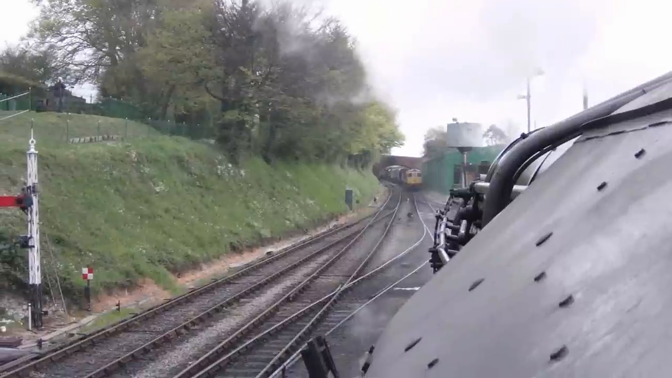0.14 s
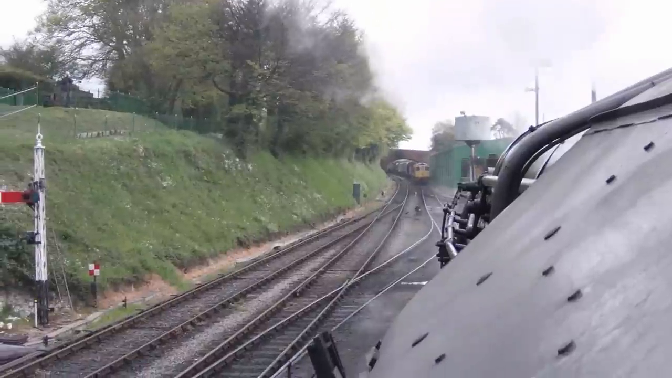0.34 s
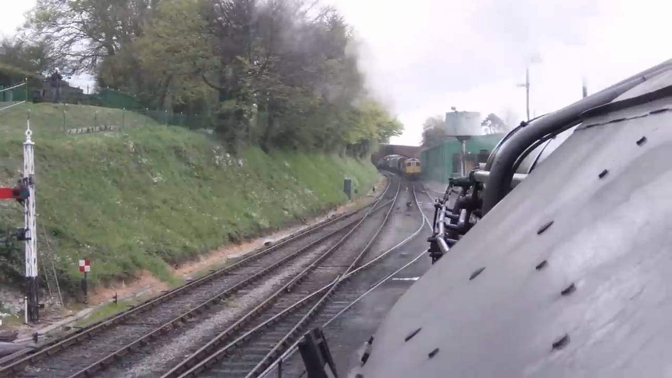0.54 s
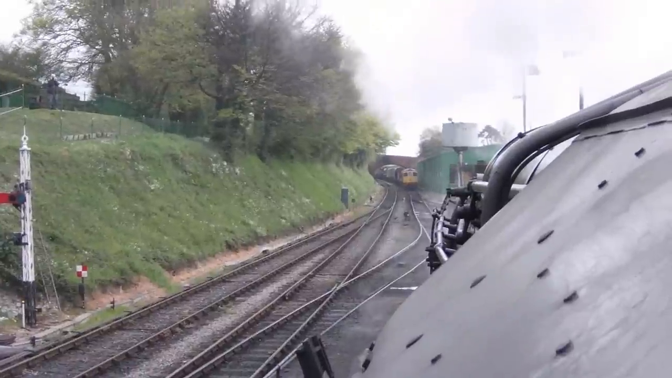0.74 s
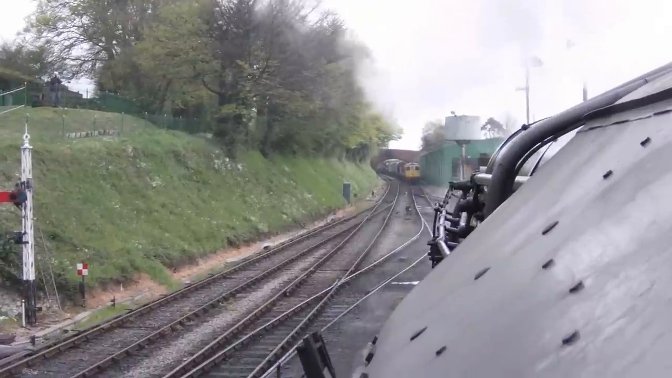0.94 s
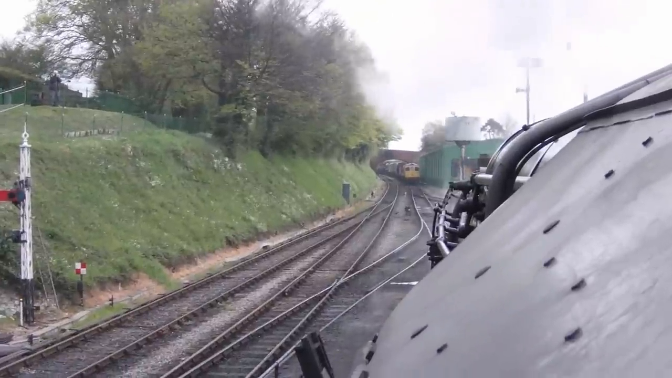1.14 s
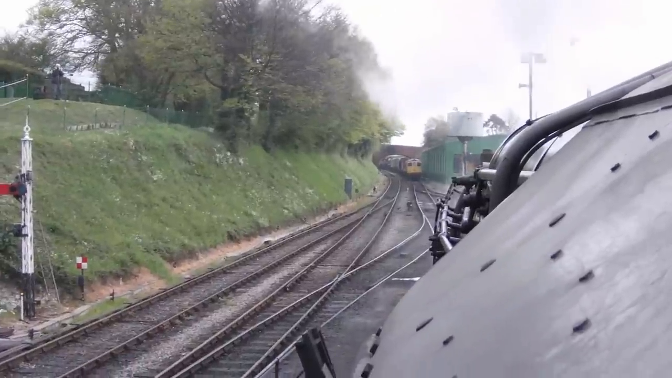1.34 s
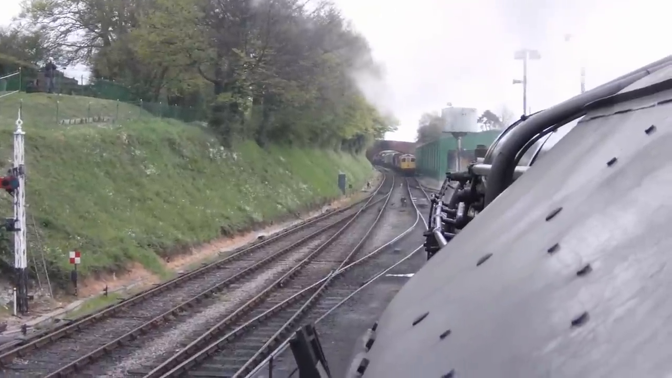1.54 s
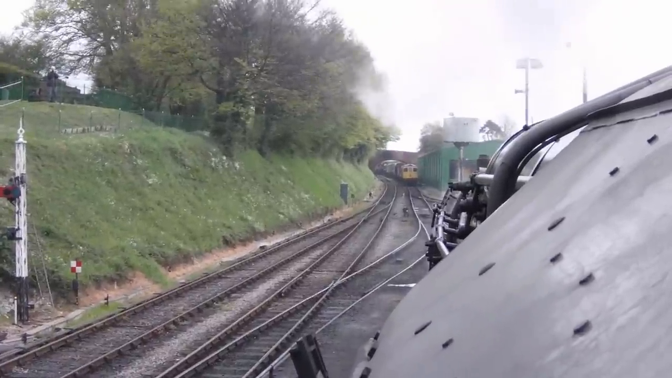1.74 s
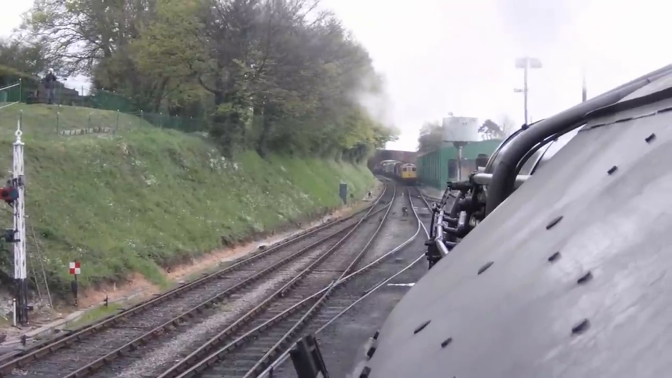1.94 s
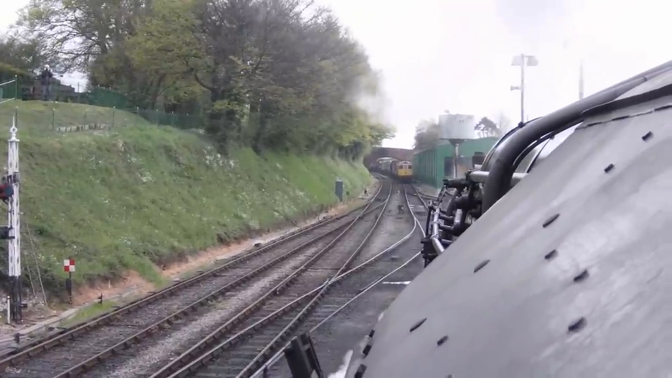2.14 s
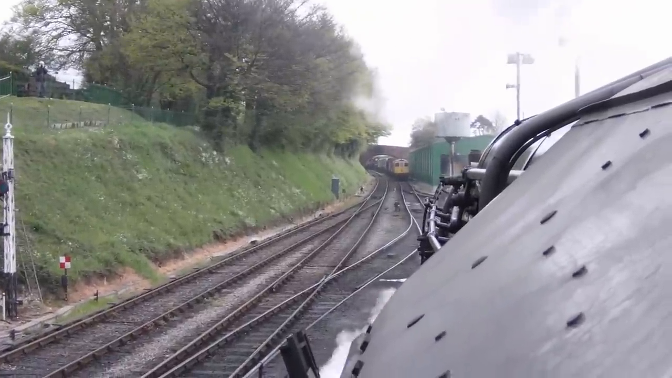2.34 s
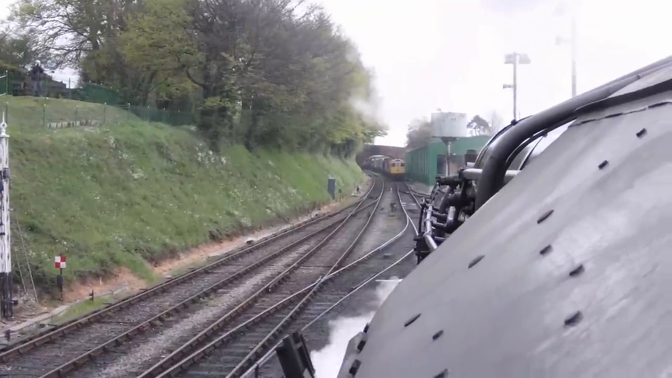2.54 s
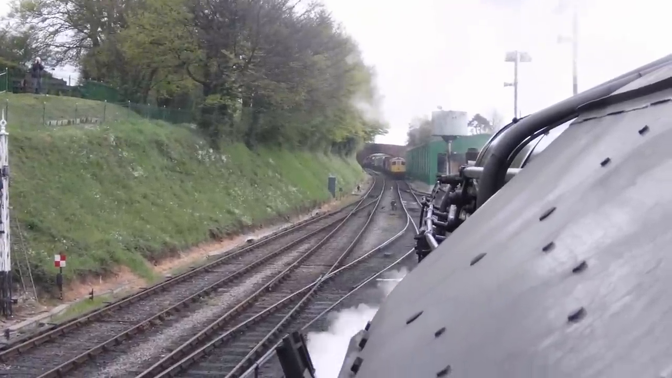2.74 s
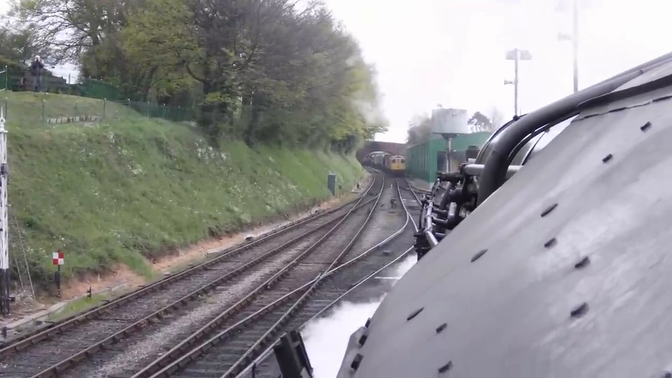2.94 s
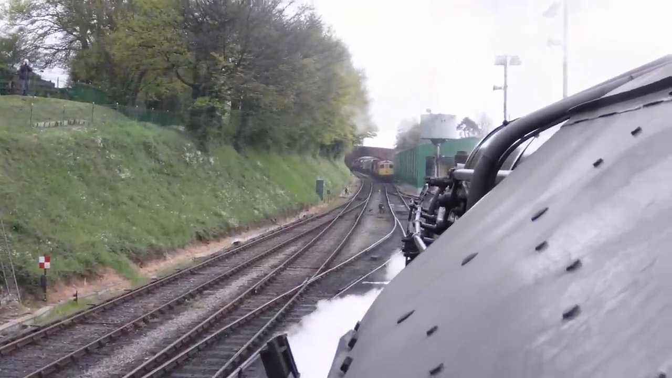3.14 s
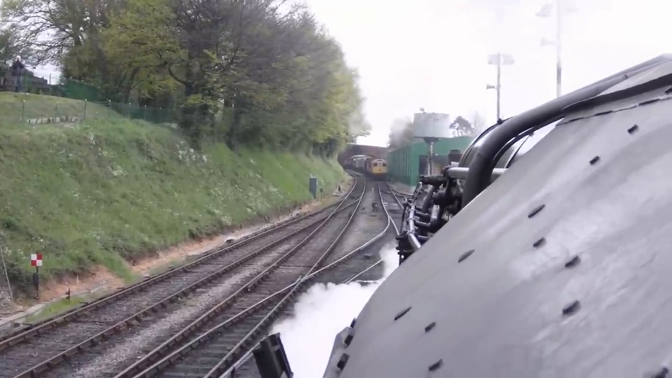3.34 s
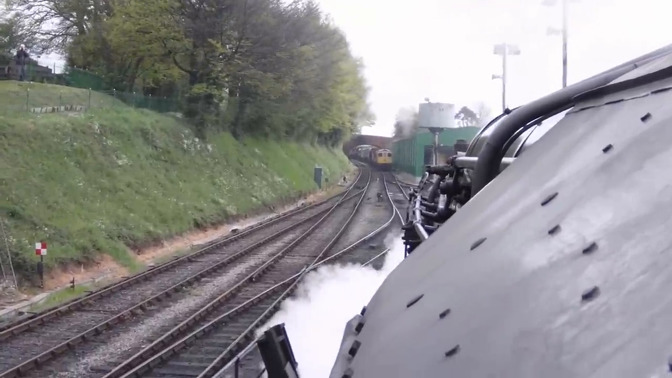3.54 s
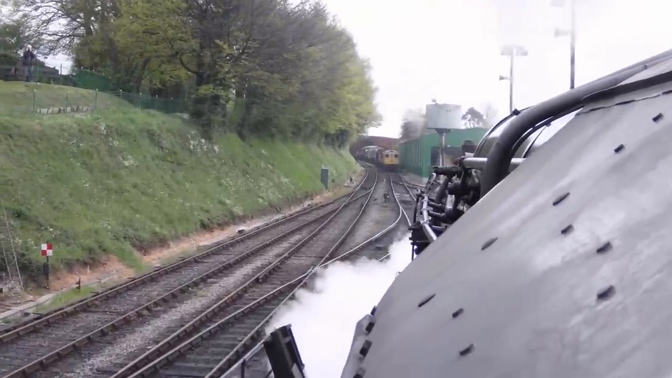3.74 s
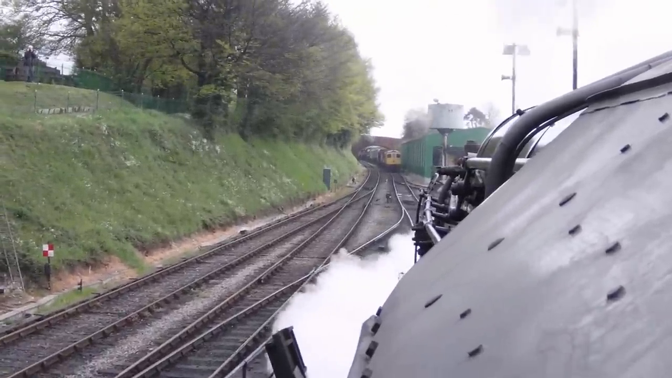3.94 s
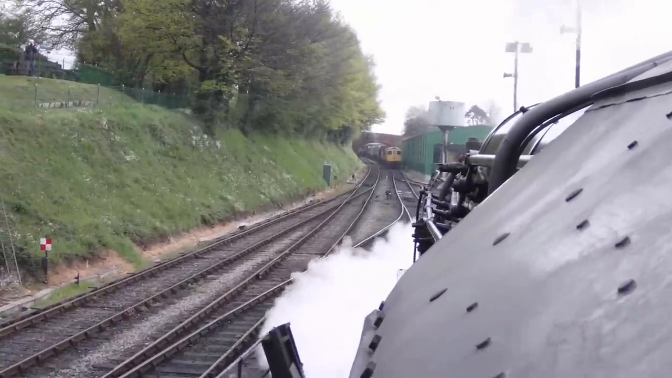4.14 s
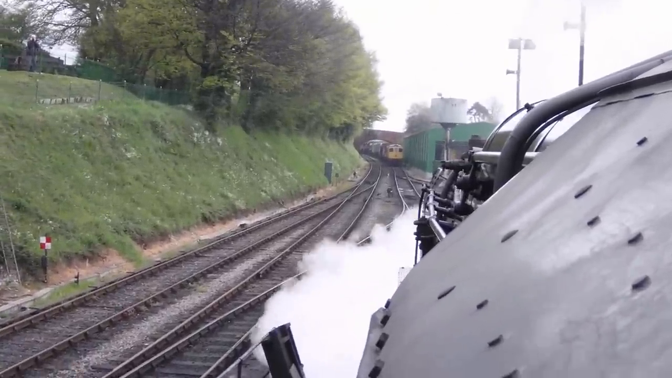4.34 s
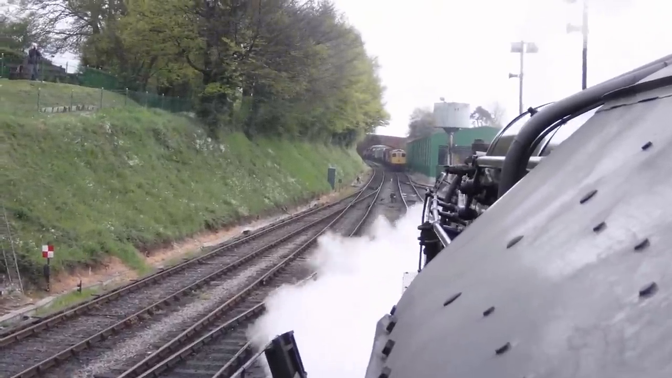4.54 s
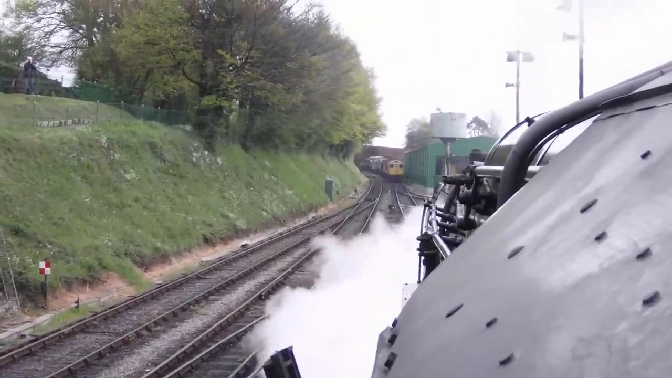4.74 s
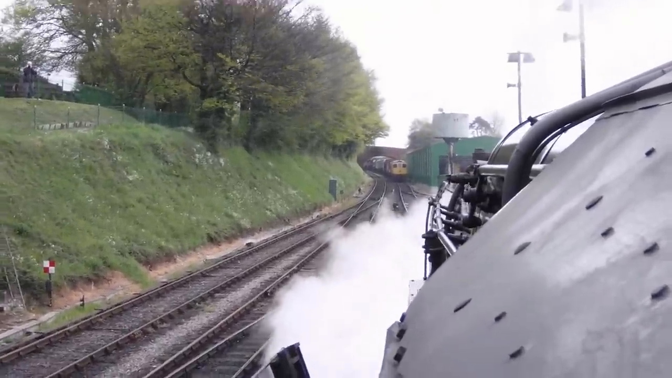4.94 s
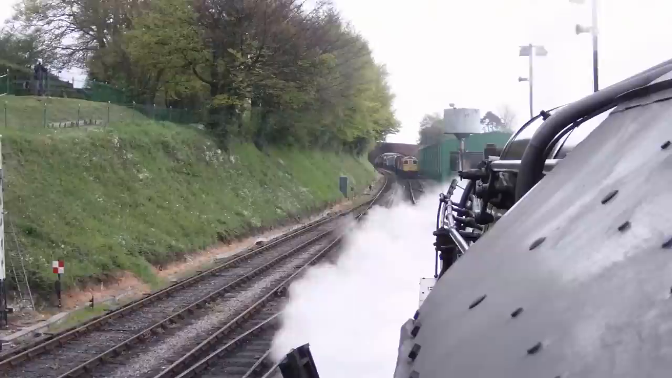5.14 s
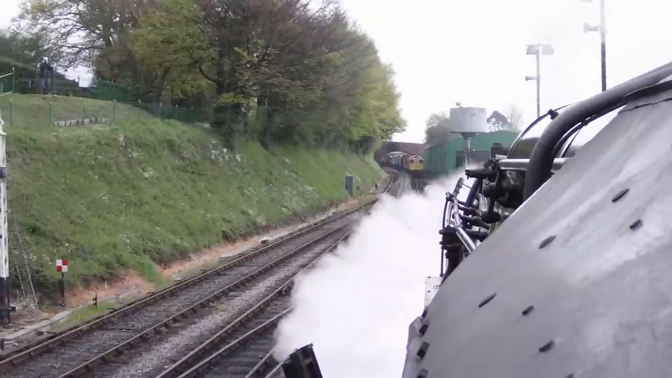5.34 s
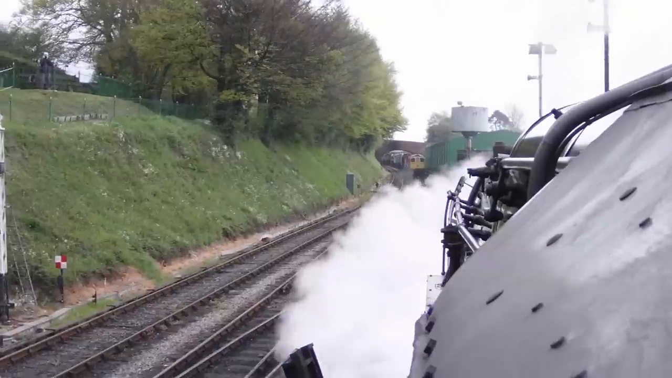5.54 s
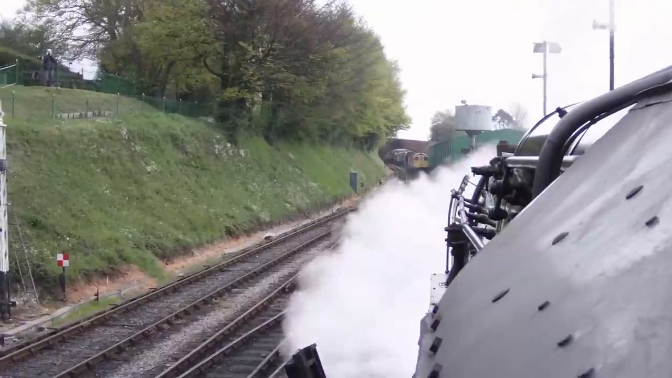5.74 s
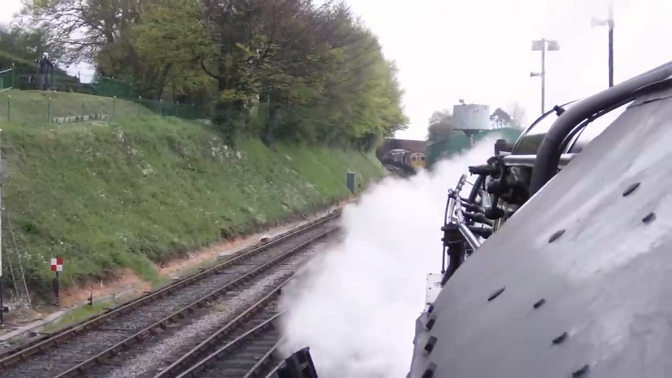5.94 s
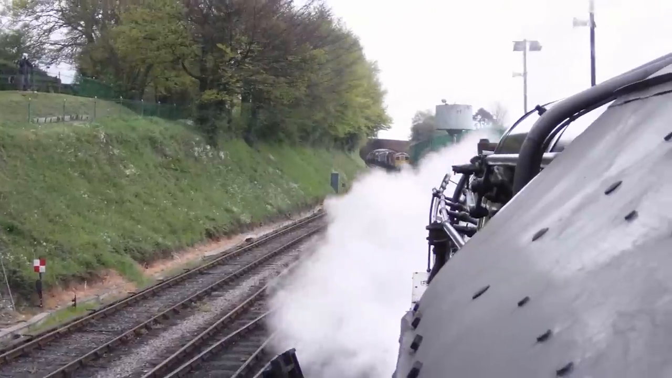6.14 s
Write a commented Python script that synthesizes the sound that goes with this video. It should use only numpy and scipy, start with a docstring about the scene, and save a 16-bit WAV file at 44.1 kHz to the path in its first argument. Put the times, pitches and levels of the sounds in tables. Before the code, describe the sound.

Outdoors, close beside a steam locomotive's boiler, soft steady steam leaks over a low, hollow chimney roar. A drain cock opens and its wet hiss swells into a long, harsh blast that overloads the microphone. It shuts abruptly, slack steel gear rattles and clanks, a shorter spurt follows with a second clank, then leaking steam and a growing wheel rumble remain.

```python
"""Steam leaks steadily and draught roars in the chimney as a steam locomotive eases away from a stand.
A drain cock then blows a long, fierce hiss that overloads the microphone, and spits once more.
As the jet dies, slack steel gear takes up with two rattling clanks; the rumble of the wheels grows.
Steam, air and wheels are coloured noise, the clanks noise bursts over decaying modes, the thud a sine pulse."""
import sys
import numpy as np
from scipy import signal
from scipy.fft import rfft, irfft
from scipy.io import wavfile

SR = 44100
rng = np.random.default_rng(int(sys.argv[2]) if len(sys.argv) > 2 else 0)


def to_wav(sig):
    """Store sig (one row per channel, or 1-D mono) as 16-bit WAV at the path in sys.argv[1].

    Samples outside -1..1 are clipped; the rate is SR.
    """
    pcm = np.clip(np.atleast_2d(sig), -1, 1) * 32767
    pcm = np.round(pcm).astype(np.int16)
    wavfile.write(sys.argv[1], SR, pcm.T)  # frames by channels


N = 277389
TIME = np.arange(N) / SR
BINS = np.maximum(np.fft.rfftfreq(N, 1 / SR), 1)


def from_db(db):
    """Decibels to amplitude gain."""
    return 10 ** (np.asarray(db) / 20)


def rms_one(x):
    """Scale to unit rms."""
    return x / np.sqrt(np.mean(x ** 2) + 1e-20)


def at_hz(points):
    """Interpolate a (Hz, value) curve over log frequency."""
    hz, value = np.transpose(points)
    return np.interp(np.log(BINS), np.log(hz), value)


def ease(at_s, rise_s):
    """A smooth step from 0 to 1 about its mid-point."""
    return .5 + .5 * np.tanh((TIME - at_s) / rise_s)


def drift(rate_hz):
    """Slow low-passed chance with a spread of 1."""
    step = 100  # samples between drawn points
    size = N // step + 2
    rolloff = 1 + (np.fft.rfftfreq(size, step / SR) / rate_hz) ** 2
    slow = irfft(rfft(rng.standard_normal(size)) / rolloff, size)
    return np.interp(np.arange(N) / step, np.arange(size), rms_one(slow))


def resonances(modes):
    """Power spectrum of a set of (Hz, width Hz, dB) peaks."""
    return sum(from_db(db) ** 2 / (1 + ((BINS - hz) / width) ** 2 * 2) ** 2 for hz, width, db in modes)


def turbulence(gain, likeness, phase=0):
    """Coloured noise at two microphone ports, correlated by likeness; rms 1."""
    mid, side = rfft(rng.standard_normal((2, N)))
    alike = np.clip(likeness, 0, 1)
    mid = mid * np.sqrt(1 + alike)
    side = side * np.sqrt(1 - alike)
    left = mid + side
    right = (mid - side) * np.exp(-1j * phase)
    return rms_one(irfft(gain * np.array([left, right]), N))


def passing_echoes(x, echo_db, nearest_s=.0017, farthest_s=.0036, rate_hz=2.7, count=8):
    """Short echoes off rails, ballast and boiler come and go, rippling the spectrum."""
    out = x.copy()
    for delay_s in rng.uniform(nearest_s, farthest_s, count):
        out += from_db(echo_db) * drift(rate_hz) * np.roll(x, round(delay_s * SR), axis=1)
    return rms_one(out)


def jet_flow(build_s=.69, release_s=.175):
    """Steam flow as a gain: it builds while the cock is open and dies quickly once it shuts."""
    # openings of the drain cock: opens_s, shuts_s, full_flow_level_db
    blows = [(1.31, 4.56, -4.2), (4.76, 5.24, -6.3)]
    flow = 1e-4
    for opens_s, shuts_s, level_db in blows:
        open_age = np.clip(TIME - opens_s, 0, shuts_s - opens_s)
        build = (1 - np.exp(-open_age / build_s)) ** 2
        release = np.exp(-np.maximum(TIME - shuts_s, 0) / release_s)
        flow = flow + from_db(level_db) * build * release
    return flow


def breeze(flow, steady_db=-45, stirred_db=-32.5, gust_db=1.0, gust_hz=7):
    """Moving air rumbles on each microphone port separately, more so while the jet blows."""
    # air rumble spectrum: frequency_hz, density_db_per_hz
    air_colour = [(10, -2), (35, 5.5), (80, 0.5), (160, -11), (400, -27), (1500, -50)]
    strength = from_db(steady_db) + from_db(stirred_db) * flow
    return turbulence(from_db(at_hz(air_colour)), 0) * strength * from_db(gust_db * drift(gust_hz))


def leak(load, level_db=-20.8, load_db=1.8, flutter_db=0.5, flutter_hz=4.5, pan_db=0.6):
    """Softer steam from glands and valves, arriving at a slant around the boiler."""
    # hiss spectrum: frequency_hz, density_db_per_hz
    leak_colour = [(150, -7), (600, -7.5), (1150, -0.5), (2200, .4), (3400, -0.8), (4800, -.9),
                   (6000, -1.5), (7300, 0), (8300, -2), (9300, -6), (10500, -10.5), (12000, -18.5),
                   (15000, -25)]
    # left-right correlation: frequency_hz, likeness_0_to_1
    leak_likeness = [(300, 0.98), (1200, 0.98), (2000, 0.83), (2900, 0.33), (3700, 0.54), (4600, .13),
                     (6300, 0.41), (8000, 0.33), (10000, .13), (15000, .12)]
    # phase between ports: frequency_hz, left_lead_rad
    leak_phase = [(100, 0), (1500, -0.12), (3000, -.5), (4500, -1.4), (6000, -2), (8300, -2.5), (10000, -3)]
    hiss = turbulence(from_db(at_hz(leak_colour)), at_hz(leak_likeness), at_hz(leak_phase))
    level = from_db(level_db + load_db * load + flutter_db * drift(flutter_hz))
    return hiss * level * from_db([[pan_db], [-pan_db]])


def wheels(load, start_db=-48, growth_db_per_s=2.5, load_db=4.8, lump_db=0.7, lump_hz=5):
    """Heavy wheels roll unevenly over the rails, louder with speed and load."""
    # rolling spectrum: frequency_hz, density_db_per_hz
    rumble_colour = [(15, -7), (30, 2), (44, 3), (58, -3), (85, 1), (120, -5), (230, -5), (340, -10),
                     (560, -10.5), (2000, -31), (6000, -53)]
    level_db = start_db + growth_db_per_s * TIME + load_db * load
    return turbulence(from_db(at_hz(rumble_colour)), 1.0) * from_db(level_db + lump_db * drift(lump_hz))


def firebox_drone(load, level_db=-32.7, load_db=-4):
    """The draught excites one low firebox resonance, weaker under load."""
    # firebox resonance: frequency_hz, width_hz, level_db
    firebox = [(191.6, 21.6, 0)]
    return turbulence(np.sqrt(resonances(firebox)), 1.0) * from_db(level_db + load_db * load)


def chimney_roar(load, level_db=-29.6, load_db=1.8, surge_db=.8, surge_hz=5.9):
    """The blower's draught excites the resonances of smokebox and chimney."""
    # smokebox and chimney resonances: frequency_hz, width_hz, level_db
    chimney = [(149, 29, -6), (243, 37, -5.5), (322, 47, -1.5), (391, 46, -3), (460, 71, -12.5),
               (646, 140, -15.5), (890, 62, -4.5), (1382, 66, -7)]
    level = from_db(level_db + load_db * load + surge_db * drift(surge_hz))
    return turbulence(np.sqrt(resonances(chimney)), 1.0) * level


def chimney_hoots(murmur_db=-38.5, swell_s=0.069):
    """The draught makes a narrow chimney resonance murmur, with brief swells in power."""
    # chimney note: frequency_hz, width_hz, level_db
    note_modes = [(803.4, 32, 0)]
    # swells of the note: peak_s, swell_level_db
    hoots = [(.36, -31), (1.27, -34), (1.62, -30.5), (5.48, -31), (5.92, -35)]
    swells = sum(from_db(db) ** 2 * np.exp(-((TIME - s) / swell_s) ** 2) for s, db in hoots)
    note = turbulence(np.sqrt(resonances(note_modes)), 0.98)
    return note * np.sqrt(from_db(murmur_db) ** 2 + swells)


def frame_thud(start_s=2.194, hz=72, swell_s=0.016, level_db=-19):
    """One soft, deep bump as the frames take the strain: a sine in a swelling, dying envelope."""
    age = np.maximum(TIME - start_s, 0)
    envelope = (age / swell_s) ** 2 * np.exp(2 - 2 * age / swell_s)
    return from_db(level_db) * envelope * np.sin(2 * np.pi * hz * age)


def knocks(count=4, chatter_s=.02, growth_db=.5, thump_hz=165, thump_db=-6, thump_delay_s=.008):
    """Each slam chatters in harder, deeper knocks and thumps the frames: (s, level dB, centre Hz)."""
    # slack gear slamming home: start_s, level_db, contact_centre_hz, pitch_spread_octaves (either way)
    slams = [(4.678, -15.5, 680, 1.4), (4.692, -14, 640, 1.55), (4.718, -15, 620, 1.6),
             (4.735, -16.5, 1300, .55), (4.996, -14.5, 1220, .6), (5.007, -15, 2350, .3),
             (5.050, -21.5, 850, 1.1)]
    rows = []
    for start_s, level_db, centre_hz, spread in slams:
        progress = (np.arange(count) + rng.random(count) / 2) / count
        times_s = start_s + chatter_s * progress
        levels_db = level_db + growth_db * (progress - .5)
        pitches_hz = centre_hz * 2 ** (spread * np.linspace(1, -1, count))
        rows += zip(times_s, levels_db, pitches_hz)
        rows.append((start_s + thump_delay_s, level_db + thump_db, thump_hz))
    return rows


def clanks(spread_octaves=0.64, crash_t60_s=0.16, crash_db=0, ring_db=-4.5, rise_s=0.00056, side_db=-11):
    """Each knock wakes the steel's modes near its own pitch, over a short crash of crowded plate modes."""
    # steel modes: frequency_hz, level_db, t60_s
    steel = [(237, 0.5, 0.27), (396, -3.5, 0.2), (479, -2.5, 0.17), (626, -9, 0.28), (852, 2.5, 0.2),
             (1044, 2, 0.26), (1240, -10, .25), (1447, -6, 0.28), (1520, -7, .25), (1769, -4, 0.31),
             (2047, 1, 0.24), (2460, -5, .3), (2550, -12, .25), (2695, -1.5, 0.29), (3424, -1, 0.18),
             (3849, -13, .25)]
    hz, mode_db, t60_s = np.transpose(steel)[:, :, None]
    out, size = np.zeros((2, N + SR)), SR // 3
    age = np.arange(size) / SR
    bins = np.maximum(np.fft.rfftfreq(size, 1 / SR), 1)

    def contact(f_hz, centre_hz):
        """Contact spectrum: a bell over log frequency."""
        return 1 / (1 + (np.log2(f_hz / centre_hz) / spread_octaves) ** 2 / 2) ** 2

    for start_s, level_db, centre_hz in knocks():
        noise = rfft(rng.standard_normal((2, size)))
        mid, side = irfft(noise * contact(bins, centre_hz), size)
        crash = rms_one(mid + from_db(side_db) * side * [[1], [-1]])
        crash = crash * from_db(crash_db - 60 * age / crash_t60_s)
        jitter_db = rng.normal(0, 1, hz.shape)
        strength = contact(hz, centre_hz) * from_db(mode_db + ring_db + jitter_db)
        ring = np.sum(strength * from_db(-60 * age / t60_s) * np.sin(2 * np.pi * hz * age), axis=0)
        attack = 1 - np.exp(-age / rise_s)
        at = round(start_s * SR)
        out[:, at:at + size] += from_db(level_db) * (crash + ring) * attack
    return out[:, :N]


def jet_hiss(flow, flutter_db=.3, flutter_hz=4):
    """Steam blasts through the orifice as broad hiss with faint whistling, following the flow."""
    # jet spectrum: frequency_hz, density_db_per_hz
    jet_colour = [(200, -33), (700, -17), (1300, -13), (2200, -7), (3100, -4.5), (4400, -3), (6000, -1.5),
                  (7200, -0.9), (8300, 0.5), (9300, -4.5), (10500, -9), (12000, -14.5), (15000, -20)]
    # left-right correlation: frequency_hz, likeness_0_to_1
    jet_likeness = [(500, 1), (2200, 1), (3300, 0.83), (4400, 0.68), (5200, 0.28), (6400, 0.32),
                    (8400, 0.44), (11000, 0.35), (15000, .4)]
    # orifice whistling: frequency_hz, width_hz, level_above_hiss_db
    whistle = [(5420, 300, -6), (8320, 100, -2)]
    colour = from_db(at_hz(jet_colour)) * np.sqrt(1 + resonances(whistle))
    hiss = passing_echoes(turbulence(colour, at_hz(jet_likeness)), echo_db=-21)
    return hiss * flow * from_db(flutter_db * drift(flutter_hz))


def drain_pipe(flow, level_db=-19.9, flow_power=.12, water_from_s=1.64, water_to_s=4.74, fade_s=.13):
    """Condensed water driven through the pipe excites its hollow resonances, barely rising with flow."""
    # drain pipe resonances: frequency_hz, width_hz, level_db
    pipe_modes = [(1130, 180, -7.5), (1570, 170, -6.5), (2050, 260, -3), (2480, 340, -1.5),
                  (3260, 420, -1.5), (3770, 190, -4.5)]
    pipe = passing_echoes(turbulence(np.sqrt(resonances(pipe_modes)), 0.92), echo_db=-11)
    wet = ease(water_from_s, fade_s) - ease(water_to_s, fade_s)
    return pipe * wet * from_db(level_db) * flow ** flow_power


def drain_cock(flow, pan_db=0.35):
    """Wet steam beside the cylinder: hollow at first, ever sharper as the flow grows."""
    return (jet_hiss(flow) + drain_pipe(flow)) * from_db([[pan_db], [-pan_db]])


def scene():
    """Steam, draught and running gear in the open air."""
    flow = jet_flow()
    load = ease(at_s=4.5, rise_s=0.12)  # the engine takes up its load
    air = breeze(flow) + leak(load)
    draught = firebox_drone(load) + chimney_roar(load) + chimney_hoots()
    gear = wheels(load) + frame_thud() + clanks()
    return air + draught + gear + drain_cock(flow)


def gain_control(x, knee_db=-4, smooth_s=0.041):
    """Gain falls a little as the smoothed power of both channels grows."""
    keep = np.exp(-1 / (smooth_s * SR))
    power = signal.lfilter([1 - keep], [1, -keep], np.mean(x ** 2, axis=0))
    return x / np.sqrt(1 + power / from_db(knee_db) ** 2)


def ports(x):
    """Each microphone port rings broadly at its own treble pitch."""
    port_hz, width_hz, peak_db = [8370, 7320], [1600, 1600], [6, 5]  # left, right
    rings = []
    for side, hz, width in zip(x, port_hz, width_hz):
        b, a = signal.iirpeak(hz, hz / width, fs=SR)
        rings.append(signal.lfilter(b, a, side))
    return x + (from_db(peak_db)[:, None] - 1) * np.array(rings)


def saturate(x, scale=0.73, bias=0.31, shift=0.26, shift_hz=110):
    """The microphone saturates lopsidedly, smearing loud hiss into bass and top."""
    bent = scale * (np.tanh(x / scale + bias) - np.tanh(bias)) / (1 - np.tanh(bias) ** 2)
    # partly rectified overload shakes each channel's resting point
    return bent - shift * signal.sosfilt(signal.butter(1, shift_hz, fs=SR, output="sos"), bent ** 2)


def record(dry, drive_db=-0.63, low_hz=24, cutoff_hz=15150):
    """Gain control, port resonance and overload, then clipping within a limited band."""
    bent = saturate(from_db(drive_db) * ports(gain_control(dry)))
    bent = signal.sosfilt(signal.butter(2, low_hz, "high", fs=SR, output="sos"), bent)
    lowpass = signal.ellip(12, .1, 80, cutoff_hz, fs=SR, output="sos")
    return signal.sosfilt(lowpass, np.clip(bent, -.95, .95))


dry = scene()
out = record(dry)
to_wav(out)
```